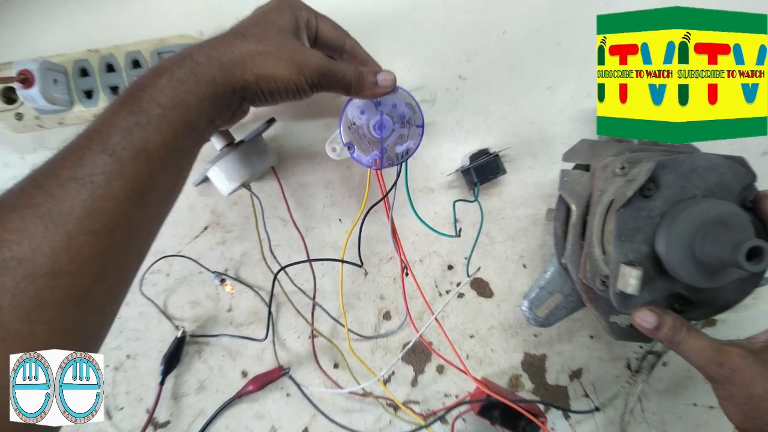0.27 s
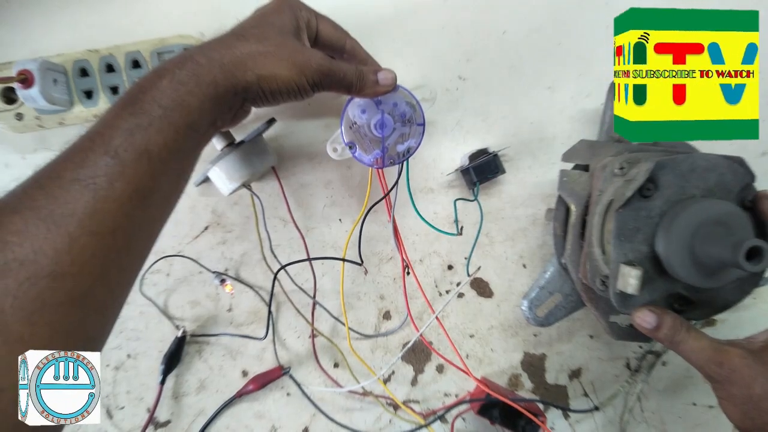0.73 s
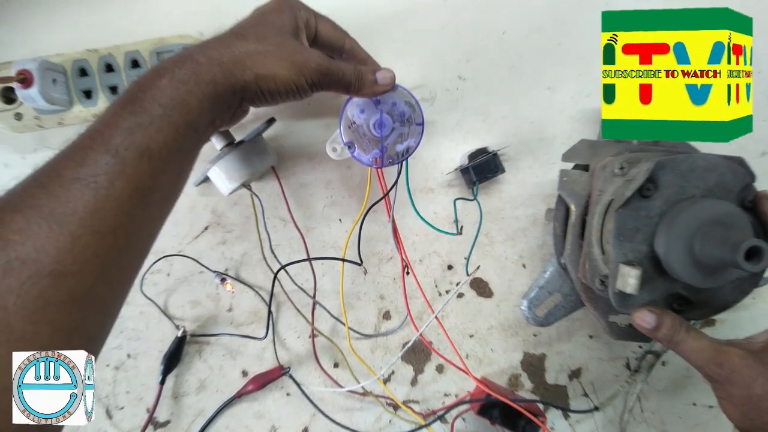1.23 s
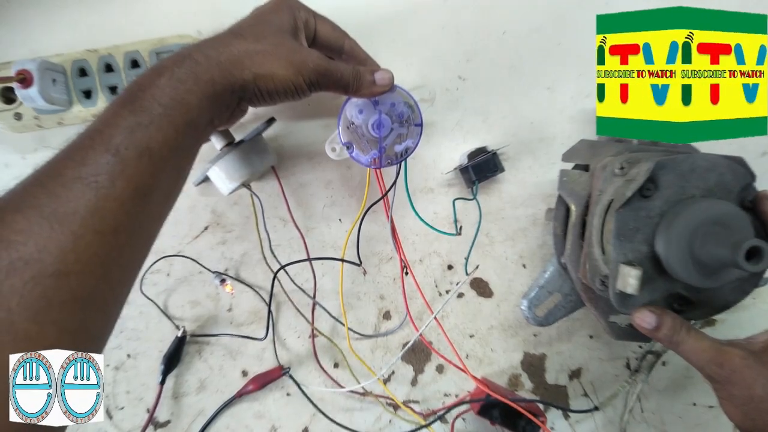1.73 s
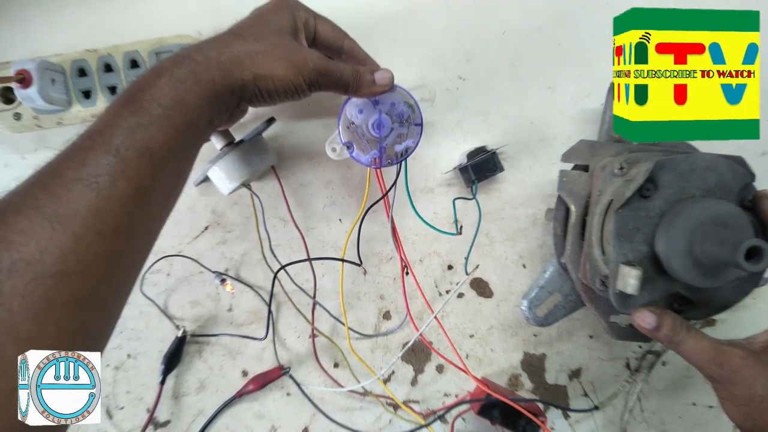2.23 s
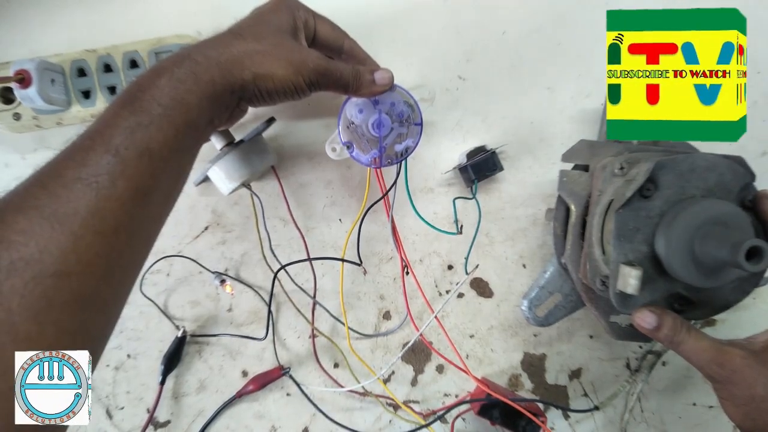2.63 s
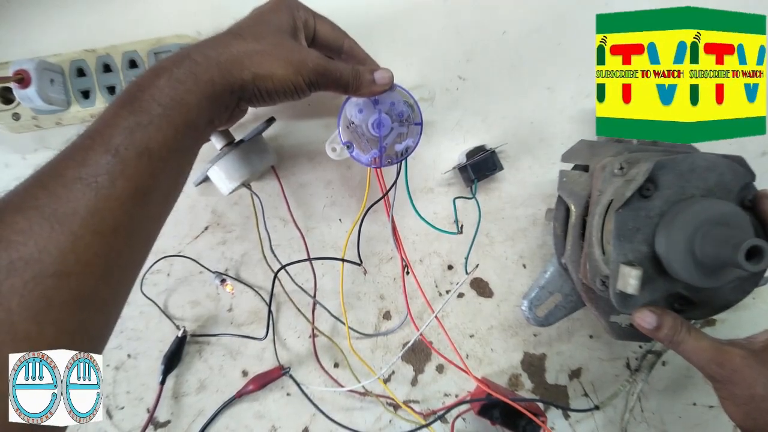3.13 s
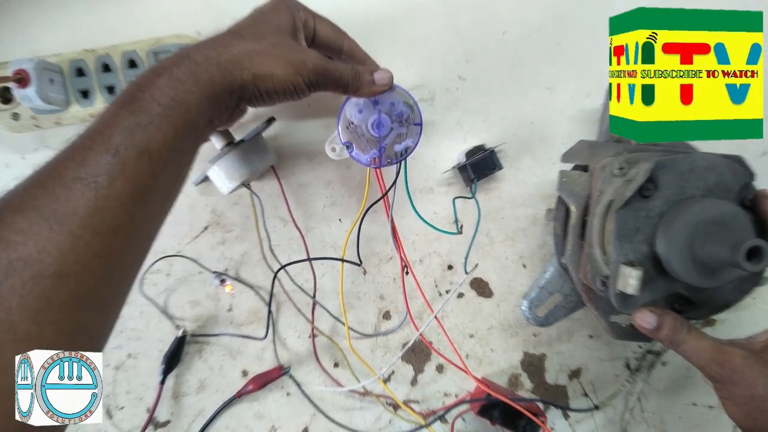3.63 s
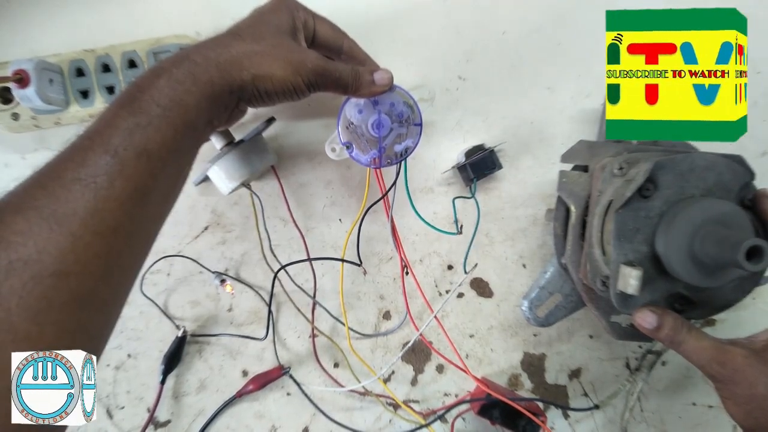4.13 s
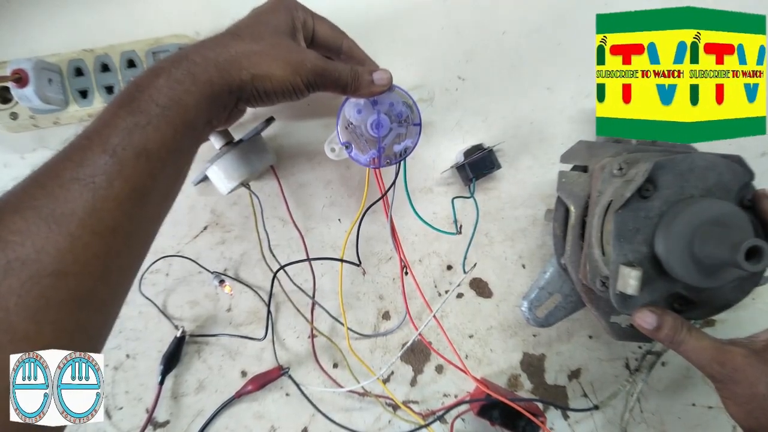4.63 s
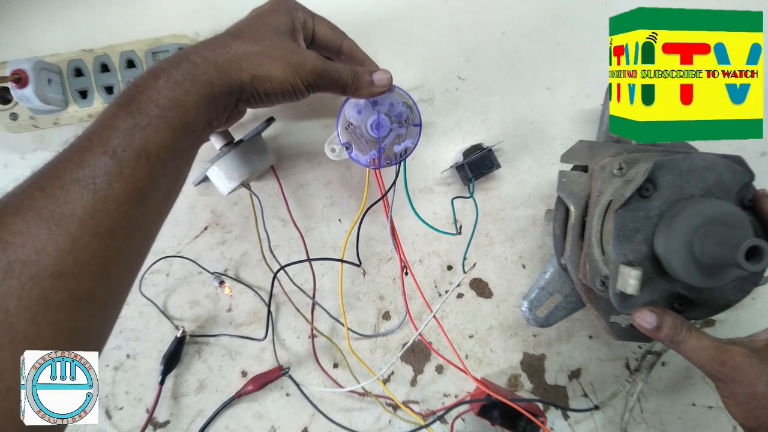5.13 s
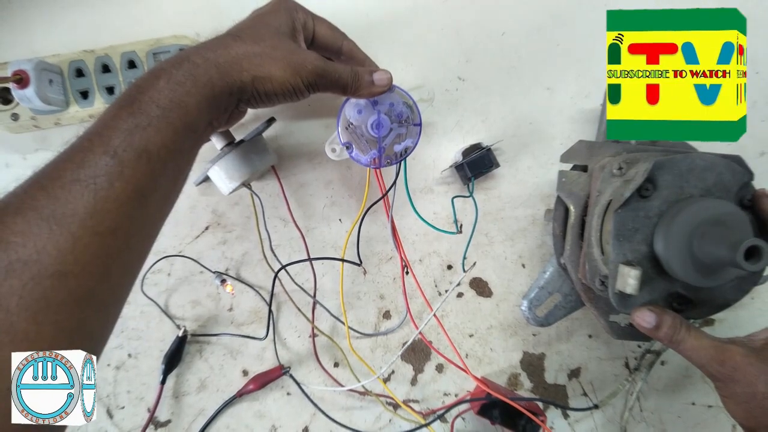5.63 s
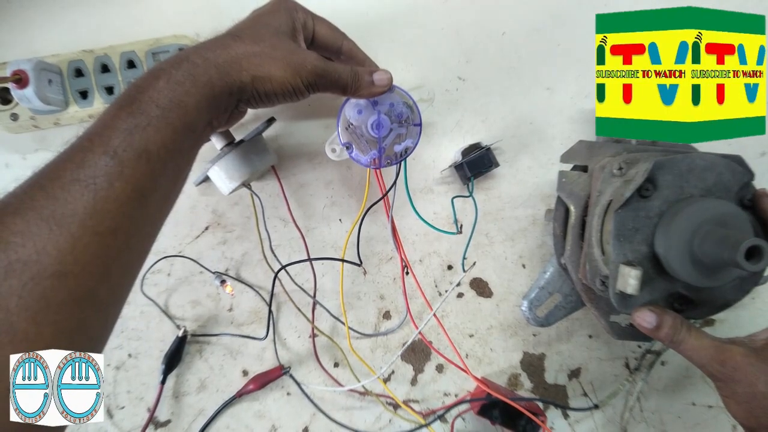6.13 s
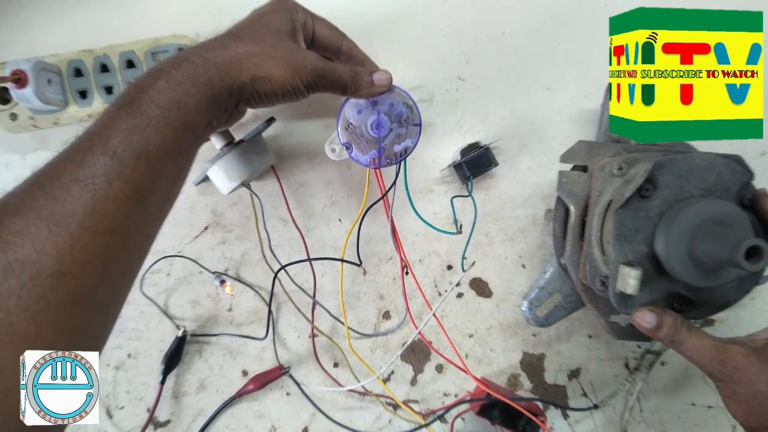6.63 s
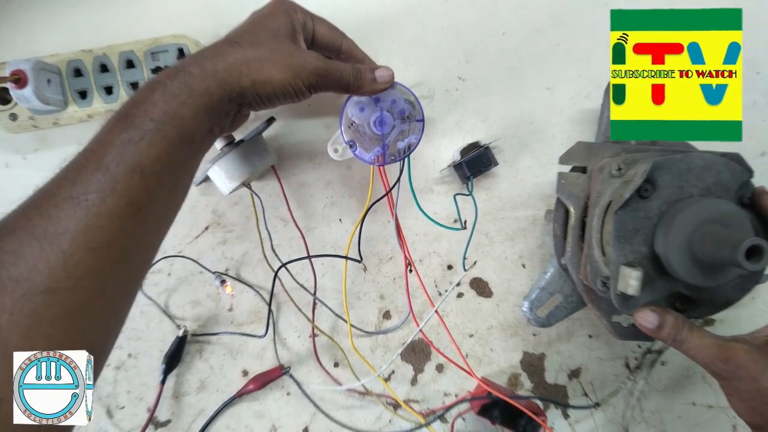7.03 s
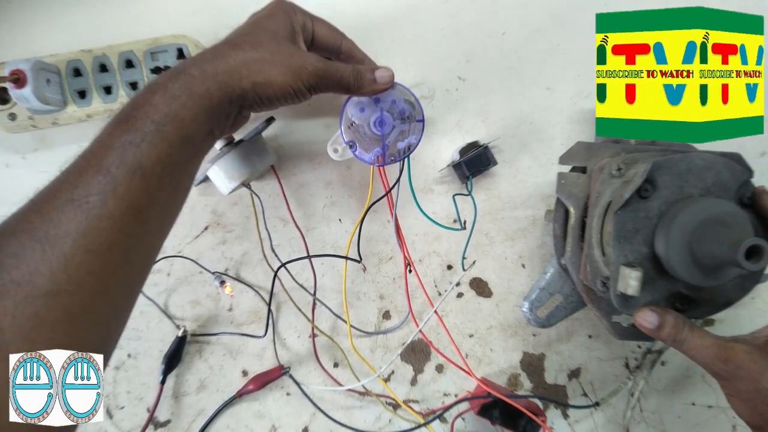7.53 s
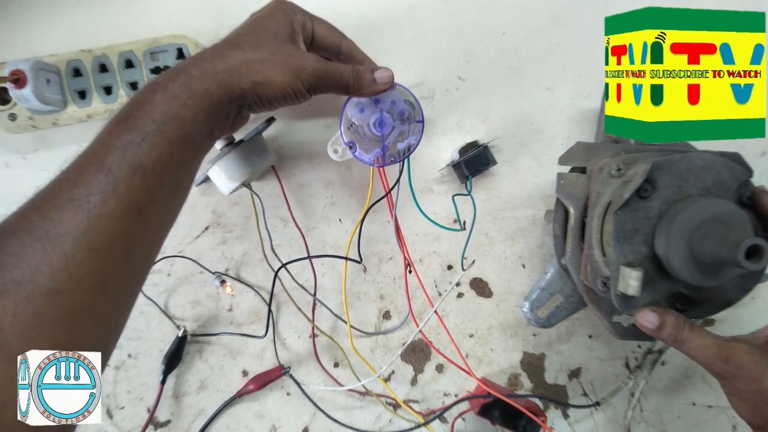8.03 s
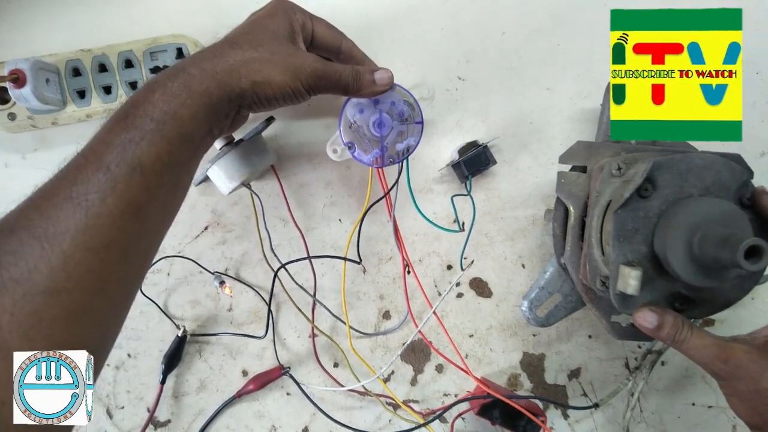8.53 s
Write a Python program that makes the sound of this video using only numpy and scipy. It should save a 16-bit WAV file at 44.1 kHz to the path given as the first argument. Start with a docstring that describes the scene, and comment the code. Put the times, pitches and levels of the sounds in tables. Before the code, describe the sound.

Close to one microphone on a workbench in a quiet room, a small mains motor is already running at 0 s. A strong, low 100 Hz hum with a few buzzy overtones dominates, over a softer lumpy whirr and fine metallic chatter. A loose rotor knocks irregularly, around ten or more times a second, with short tinny rattles; the hum hitches and stumbles at each knock. From about 4 to 7 s the knocks are often harder and the metal rings more brightly, around 4.5 s and 6 to 7 s especially, then the rattle calms towards 8 s. A soft thud comes near 7.85 s. At 8.2 s a timer switch snaps with a crisp, bright double-edged click; the motor stops and the hum rings away in about 0.2 s. From 8.3 to 8.7 s several soft low bench thuds and faint short tones are heard, then only very quiet room air.

```python
"""On a workbench in a quiet room, close to one microphone: a small mains motor hums, whirrs and chatters.
Its loose rotor knocks in the metal frame; hum and noise are short pieces faded into each other, so the
hum stumbles at the joins. Near the end a timer switch snaps and the hum rings out.
Soft thuds and faint tones in the bench, made of briefly swelling sines, come around and after the snap."""
import sys
import numpy as np
from scipy import signal
from scipy.fft import rfft, irfft
from scipy.io import wavfile
from scipy.ndimage import uniform_filter1d

SR = 44100
rng = np.random.default_rng(int(sys.argv[2]) if len(sys.argv) > 2 else 0)


def ratio(d):
    """dB to gain"""
    e = np.asarray(d, float) / 20
    return 10 ** e


def digitize_waveform(pressure):
    """Quantize a signal to 16-bit integers and store it at the path in sys.argv[1].

    Rows of a 2-D input are taken as channels; values are limited to [-1, 1].
    """
    field = np.atleast_2d(pressure).T
    bounded = np.clip(field, -1, 1)
    quanta = np.round(bounded * 32767).astype(np.int16)
    wavfile.write(sys.argv[1], SR, quanta)


N = 387638
T = np.arange(N) / SR  # s
STOP_S = 8.214  # the power is cut


def evened(x):
    """Scales to rms 1."""
    return x / np.sqrt(np.mean(x ** 2) + 1e-20)


def read(points, hz):
    """Reads a spectrum table on a log-frequency axis."""
    f, value = np.transpose(points)
    return np.interp(np.log(hz + 1), np.log(f + 1), value)


def response(points, modes=()):
    """Causal (minimum-phase) impulse response of a broad colour with resonances standing on it."""
    hz = np.fft.rfftfreq(8192, 1 / SR)
    bumps = sum((ratio(db) - 1) / (1 + (2 * (hz - f) / width) ** 2) for f, width, db in modes)
    magnitude = ratio(read(points, hz)) * np.maximum(1 + bumps, 0.1)
    # folding the cepstrum onto positive times makes the response causal
    fold = irfft(np.log(magnitude))
    fold[1:4096] *= 2
    fold[4097:] = 0
    return irfft(np.exp(rfft(fold)))[:4096]


def coloured(x, taps):
    """Passes x through an impulse response."""
    return signal.oaconvolve(x, taps)[:N]


def drift(seconds):
    """Slow chance of rms 1: noise smoothed twice over the given time."""
    span = max(int(seconds * SR / 16), 2)
    coarse = rng.standard_normal(N // 16 + 1)
    coarse = uniform_filter1d(uniform_filter1d(coarse, span), span)
    return np.interp(np.arange(N) / 16, np.arange(len(coarse)), evened(coarse))


# How the motor runs, each level before its source's own trim: time_s, hum_db, whirr_db, chatter_db
RUNNING = [(0.0, -15, -32, -42.5), (0.45, -15, -31.5, -46), (2.73, -15, -31, -44.5),
           (3.79, -15, -31.5, -45), (4.46, -14.5, -30, -42), (4.9, -17, -33, -42.5), (6.59, -16, -35, -42),
           (6.9, -16.5, -33.5, -44.5), (8.03, -16.5, -32, -47.5), (8.1, -16, -31.5, -46)]


def run_db(column, t60):
    """A level while the motor runs, falling 60 dB per t60 seconds once the power is cut."""
    rows = np.transpose(RUNNING)
    return np.interp(T, rows[0], rows[column]) - 60 * np.maximum(T - STOP_S, 0) / t60


CALM_DB = -44  # chatter level from which harder running is counted


def effort_db(s):
    """How much harder than usual the rotor chatters."""
    rows = np.transpose(RUNNING)
    return np.interp(s, rows[0], rows[3]) - CALM_DB


FADE_S = 0.034  # length of a join
LEAD_S = 0.005  # a join is half done this long before its knock


def across_joins(held):
    """Fades each piece's value into the next by smoothing the steps over one join length."""
    u = np.linspace(0, 1, int(FADE_S * SR))
    fade = np.sin(np.pi * u ** 1.06) ** 2
    half = np.searchsorted(np.cumsum(fade), fade.sum() / 2)
    padded = np.r_[np.full(len(u), held[0]), held, np.full(len(u), held[-1])]
    return signal.oaconvolve(padded, fade / fade.sum())[len(u) + half:][:N]


def piece_number(hits):
    """Which piece is playing at each sample."""
    return np.searchsorted(hits[:, 0] - LEAD_S, T)


def join_dip(hits):
    """Two unrelated noises at half gain each sum 3 dB low in the middle of a join."""
    odd = across_joins(piece_number(hits) % 2.)
    return np.sqrt(odd ** 2 + (1 - odd) ** 2)


HUM_HZ = 100  # twice the mains rate
# Overtones of the magnetic hum: multiple (of the hum), level_db (over the running level), waver_db (rms)
HUM_ORDERS = [(1, 1.5, 0.32), (2, -26.5, 3), (3, -8, 1.5), (4, -24.5, 1), (7, -27, 1.5), (8, -35.5, 0.5),
              (9, -30, 1.4), (10, -32, 0.5)]


def hum(hits):
    """Magnetic pull on the iron; across a join the old and new pieces partly cancel."""
    ahead = np.cumsum(np.r_[2.5, hits[:, 2]]) / 1000  # s; the lowest tone begins at a zero crossing
    playing = piece_number(hits)
    let_go_db = 3.3 * np.clip((T - STOP_S) / 0.004, 0, 1)  # the driven part stops at once
    out = np.zeros(N)
    for order, db, waver_db in HUM_ORDERS:
        k = round(order)
        piece = across_joins(np.exp(2j * np.pi * k * HUM_HZ * ahead)[playing])
        lag = 0.2 * (k > 1)  # overtones trail by a fifth of their cycle
        t60 = 0.19 if k == 1 else 0.04  # the bench rings on at the lowest tone
        level_db = run_db(column=1, t60=t60) + db + waver_db * drift(0.0095) - let_go_db
        tone = (piece * np.exp(2j * np.pi * (k * HUM_HZ * T - lag))).real
        out += np.sqrt(2) * ratio(level_db) * tone
    return out


# Broad colour of the spinning whirr: pitch_hz, level_db (relative)
WHIRR_COLOUR = [(25, -10.5), (60, -8), (100, 10.5), (160, 1.5), (300, 4.5), (500, -5), (900, -3.5),
                (1450, -16), (1700, -14), (3000, -42.5), (6000, -42), (8000, -46), (11000, -50),
                (13500, -63.5), (16000, -100)]
# Modes of the metal frame, shaken by whirr, chatter and knocks: pitch_hz, width_hz, level_db (over the colour)
FRAME_MODES = [(550, 39, 1.5), (698, 47, 4.5), (883, 99, 4), (1136, 44, 2.5), (1300, 130, 8),
               (1415, 38, 10), (1973, 140, 5), (2300, 26, 8.5), (2900, 97, 12.5), (3050, 210, -9),
               (3240, 80, 2.5), (3560, 70, 6), (4025, 80, 7.5), (4710, 32, 7.5), (5200, 57, 6),
               (5390, 50, 1.5), (5910, 73, 8.5), (6417, 76, 12), (7190, 110, 9), (7700, 74, 3),
               (8870, 80, -0.5), (9370, 74, 9.5), (11600, 220, 4.5), (13750, 150, 7.5)]


def whirr():
    """Air and bearings: lumpy low noise that also shakes the frame."""
    noise = rng.standard_normal(N) * ratio(0.77 * drift(0.0026))
    sound = evened(coloured(noise, response(WHIRR_COLOUR, FRAME_MODES)))
    return ratio(2.5 + run_db(column=2, t60=0.18)) * sound


# Broad colour of metal on metal, for chatter and knocks: pitch_hz, level_db (relative)
CLATTER_COLOUR = [(40, -10.5), (90, -1), (200, -5), (400, 6.5), (1000, -2), (1500, -6), (2500, -10),
                  (3300, -15), (6500, -22.5), (7800, -32), (12000, -41.5), (13500, -47.5), (15000, -62),
                  (16000, -77.5)]


def chatter():
    """Many tiny contacts of uneven size, about 3000 a second, in clumps."""
    size = ratio(1.3 * np.minimum(rng.exponential(1, N), 5)) * rng.choice([-1., 1.], N)
    contacts = size * (rng.random(N) < 3000 / SR) * ratio(2.57 * drift(0.0087))
    sound = evened(coloured(contacts, response(CLATTER_COLOUR, FRAME_MODES)))
    return ratio(8.5 + run_db(column=3, t60=0.12)) * sound


RING_HZ, RING_DB, RING_PER_DB = 2870, -2.1, 0.7  # freest mode, its usual gain, gain in dB per dB of effort
RING_WAVER_DB, RING_SWELL_S = 1.5, 0.06


def swelling_ring(metal):
    """The freest mode of the frame swells with harder running and wavers."""
    mode = signal.lfilter(*signal.iirpeak(RING_HZ, 14, SR), metal)
    gain_db = RING_DB + RING_PER_DB * effort_db(T) + RING_WAVER_DB * drift(RING_SWELL_S)
    return metal + (ratio(gain_db) - 1) * mode


# Colour of the quiet room: pitch_hz, level_db (per Hz, relative)
ROOM_COLOUR = [(20, -13.5), (40, 2), (100, 3), (200, -15.5), (400, -21), (900, -27.5), (2000, -35.5),
               (7000, -50), (13000, -46.5), (16000, -67)]
ROOM_DB = -50.5  # rms, until it sinks


def room():
    """Quiet air of the room, steady noise sinking away at the end."""
    sink_db = 6.0 * np.clip((T - 8.68) / 0.14, 0, 1)
    return ratio(ROOM_DB - sink_db) * evened(coloured(rng.standard_normal(N), response(ROOM_COLOUR)))


# Strong rotor knocks, with pieces joined at each: start_s, level_db (relative), jump_ms (hum jumps ahead)
STRONG_KNOCKS = [(.0741, -32, -1.4), (.194, -26, 3), (.2732, -27.5, 1.61), (.359, -28.5, 1.94),
                 (.5423, -32, 3.5), (.6325, -29, -4), (.729, -26.5, -1.5), (.7726, -32, -3.5),
                 (.828, -27, 4.5), (.8952, -30.5, 2), (.982, -42, 3), (1.0137, -26.5, 0.17),
                 (1.078, -27.5, 3), (1.1788, -28, -4.5), (1.284, -48, 4.5), (1.344, -29.5, -2),
                 (1.3823, -27.5, 1.23), (1.4296, -34, 3), (1.5496, -26, -1.08), (1.611, -32, -3),
                 (1.714, -28.5, 0.49), (1.7982, -28.5, 2.5), (1.8653, -31, -4.5), (1.901, -26.5, 4),
                 (1.943, -42, 3), (2.0712, -26.5, -3.5), (2.1457, -29.5, 5), (2.2287, -33, 4),
                 (2.2702, -26, -0.95), (2.332, -29.5, -3.5), (2.3767, -37, -4.5), (2.5205, -28.5, 4.5),
                 (2.5953, -27.5, -3), (2.6434, -29, 1.85), (2.7674, -29, -3.5), (2.886, -43, -4),
                 (2.97, -24.5, 4), (3.0524, -28.5, 4), (3.128, -30, -3.5), (3.2368, -27, 2.5),
                 (3.335, -29, 1.23), (3.4008, -29, 1.13), (3.5851, -26, -2.19), (3.633, -34, 3.5),
                 (3.71, -30, 3), (3.7712, -26, 2.5), (3.9535, -28, -4), (4.036, -27, -1.74),
                 (4.121, -30, 2.5), (4.1666, -25, -3.5), (4.2398, -31, -2.06), (4.3056, -24.5, 1.46),
                 (4.3518, -29, -4.5), (4.3948, -25.5, -1.5), (4.4884, -23.5, 4), (4.5345, -37.5, -4),
                 (4.578, -27.5, -2.5), (4.6638, -27.5, 3.5), (4.704, -36, -3), (4.7767, -28, 4),
                 (4.8594, -27.5, -3), (4.907, -32, 1.95), (4.957, -32.5, -.8), (5.0732, -29, -4),
                 (5.1678, -37, -2.5), (5.2084, -25.5, 2.5), (5.255, -28.5, -3), (5.383, -29, 0.37),
                 (5.444, -27, 1.72), (5.5143, -29.5, -1.88), (5.5665, -27, -4.5), (5.6234, -28.5, 4),
                 (5.731, -28.5, -3.5), (5.8434, -27.5, 5), (5.9275, -27.5, 5), (6.0305, -26, -1.56),
                 (6.1933, -24.5, -1.75), (6.2635, -46, -4), (6.347, -23.5, 3), (6.5136, -28.5, 0),
                 (6.5853, -26.5, 3.5), (6.7252, -25, -4.5), (6.8116, -23.5, 0.5), (6.9346, -29, 4.5),
                 (6.984, -33, -4), (7.1473, -30.5, -3.5), (7.226, -45, -4), (7.3048, -26, -0.43),
                 (7.3753, -30, 0.8), (7.4995, -33, 1.5), (7.5377, -30, 1.7), (7.6727, -28, -0.7),
                 (7.9263, -33, -3.5), (7.9717, -36, -3.5), (8.0281, -33.5, -2.5), (8.0706, -37, -3),
                 (8.114, -32.5, 2.5), (8.198, -45, -3)]
SMALL_GAP_S, SMALL_JITTER_S = 0.058, 0.008  # usual spacing of lesser knocks, and its chance
SMALL_OVER_DB, SMALL_SPREAD_DB = 9.5, 4  # their level over the chatter column, and its chance
SMALL_JUMP_MS = 1.7
CALMING_DB = 2.5  # this far below the usual chatter, lesser knocks no longer make the hum jump


def all_knocks():
    """The strong knocks, with lesser ones spread by chance through the gaps: rows (s, dB, ms)."""
    edges = np.r_[0, np.transpose(STRONG_KNOCKS)[0]]
    gaps = []
    for a, b in zip(edges, edges[1:]):
        parts = max(round((b - a) / SMALL_GAP_S), 1)
        gaps.append(np.linspace(a, b, parts + 1)[1:-1])
    s = np.concatenate(gaps)
    late, size, jump, way = rng.standard_normal((len(s), 4)).T
    start_s = s + SMALL_JITTER_S * np.clip(late, -2, 2)
    level_db = CALM_DB + effort_db(s) + SMALL_OVER_DB + SMALL_SPREAD_DB * size
    calming = np.clip(1 + effort_db(s) / CALMING_DB, 0, 1)
    jump_ms = SMALL_JUMP_MS * np.sign(way) * (1 + 0.45 * jump) * calming
    rows = np.r_[STRONG_KNOCKS, np.c_[start_s, level_db, jump_ms]]
    return rows[np.argsort(rows[:, 0])]


LOW_PER_DB, LOW_SPREAD_DB = -1.5, 1.5  # harder running thins the low part of a knock; chance


def knocks(hits):
    """Each knock is a sharp strike in a burst of contacts with a rattling tail; its low part varies."""
    t = np.arange(3500) / SR
    shape = (1 - np.exp(-t / 0.0013)) * (np.exp(-t / 0.0033) + 0.37 * np.exp(-t / 0.037))
    taps = response(CLATTER_COLOUR, FRAME_MODES)
    high = signal.sosfilt(signal.butter(2, 1800, "high", fs=SR, output="sos"), taps)
    bright, dull = np.zeros((2, N + len(t)))
    lows_db = LOW_PER_DB * effort_db(hits[:, 0]) + LOW_SPREAD_DB * rng.standard_normal(len(hits))
    for (s, db, _), low_db in zip(hits, lows_db):
        at = round(s * SR)
        contacts = rng.standard_normal(len(t)) * (rng.random(len(t)) < 0.3) / np.sqrt(0.3)
        burst = shape * contacts
        burst[30] += ratio(4.5) * rng.choice([-1., 1.])  # the strike
        bright[at:at + len(t)] += ratio(db) * burst
        dull[at:at + len(t)] += ratio(db + low_db) * burst
    sound = coloured(bright, high) + ratio(-4) * coloured(dull, taps - high)
    return ratio(-4.0) * sound / np.linalg.norm(high)


OVERTONE = 1.95  # multiple of the thud's pitch
UNDER_HZ, UNDER_DB, UNDER_S = 35, -6.5, 0.058  # a slow heave lies under each thud
# Soft thuds in the bench: start_s, level_db (peak), pitch_hz, length_s, overtone_db (over the thud)
BENCH_THUDS = [(7.854, -24.5, 58, .05, 0), (8.388, -30, 96.5, 0.13, -20), (8.441, -32, 88.5, 0.043, 1.5),
               (8.491, -34, 114, 0.064, -16), (8.527, -31, 83.4, 0.056, -2), (8.592, -37.5, 90, 0.062, -20),
               (8.628, -29.5, 94, 0.028, -14)]
# Faint short tones: start_s, level_db (peak), pitch_hz, length_s
FAINT_TONES = [(8.325, -41.5, 295, 0.083), (8.355, -56, 770, .018), (8.372, -62, 760, .02),
               (8.499, -61, 1510, .03), (8.621, -46, 307, 0.066), (8.687, -66, 300, 0.1)]


def thuds():
    """Soft pushes and faint tones: sines that swell and die, with a gritty edge of low noise."""
    out, push = np.zeros((2, N))
    tones = list(FAINT_TONES)
    for s, db, hz, length, over_db in BENCH_THUDS:
        tones.append((s, db, hz, length))
        tones.append((s, db + over_db, hz * OVERTONE, length * 0.6))
        tones.append((s, db + UNDER_DB, UNDER_HZ, UNDER_S))
    for (s, db, hz, length), phase in zip(tones, rng.random(len(tones))):
        at, u = round(s * SR), np.linspace(0, 1, round(length * SR))
        swell = ratio(db) * np.sin(np.pi * u ** 0.48) ** 2
        out[at:at + len(u)] += swell * np.sin(2 * np.pi * (hz * length * u + phase))
        push[at:at + len(u)] += swell
    band = signal.butter(2, [60, 260], "band", fs=SR, output="sos")
    grit = signal.sosfilt(band, rng.standard_normal(N))
    return out + ratio(-26) * push * evened(grit)


# Snaps of the switch: start_s, level_db (relative)
SWITCH_SNAPS = [(8.1936, -39), (8.198, -42.5), (8.205, -35.5), (8.209, -23.5), (8.2119, -29)]
# Broad colour of the switch: pitch_hz, level_db (relative)
SWITCH_BROAD = [(500, -13), (2000, -6), (4000, -10), (6000, -4.5), (8000, -11), (12000, -16),
                (14500, -26.5), (16000, -45)]
# Damped modes of the switch: pitch_hz, width_hz, level_db (over the colour)
SWITCH_MODES = [(2950, 340, 3.9), (5160, 420, 10), (5930, 330, 10), (6600, 370, 3.1), (8400, 500, 3),
                (10000, 500, 3.6), (12600, 500, 3)]


def switch():
    """The contact spring lets go and lands: a crack, then the plastic housing buzzes out."""
    t = np.arange(8000) / SR
    crack, buzz = ratio(-60 * t / 0.019), ratio(-17 - 60 * t / 0.17)
    shape = (1 - np.exp(-t / 0.00027)) * (crack + buzz)
    force = np.zeros(N)
    for s, db in SWITCH_SNAPS:
        force[round(s * SR)] = ratio(db)
    taps = response(SWITCH_BROAD, SWITCH_MODES)
    rough = coloured(force, shape) * rng.standard_normal(N)
    return coloured(rough, taps / np.linalg.norm(taps))


def scene():
    """All sources, close to one microphone."""
    hits = all_knocks()
    metal = swelling_ring(join_dip(hits) * (whirr() + chatter()) + knocks(hits))
    return (hum(hits) + metal + room() + thuds() + switch())[None]


def band_limit(x):
    """A steep low-pass at the top of the band."""
    return signal.sosfilt(signal.butter(12, 15720, fs=SR, output="sos"), x)


def record(dry):
    """Takes the finished mix from the microphone to the output."""
    return band_limit(dry)


dry = scene()
out = record(dry)
digitize_waveform(out)
```